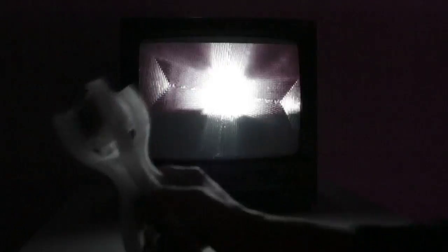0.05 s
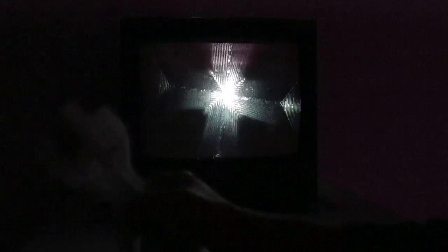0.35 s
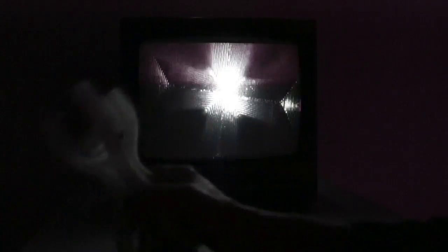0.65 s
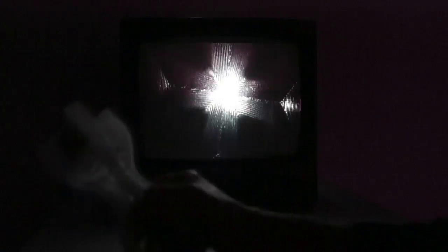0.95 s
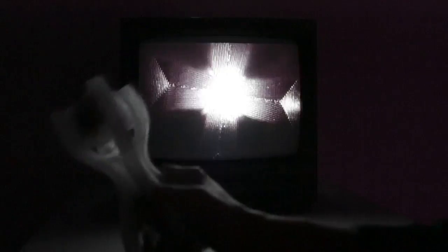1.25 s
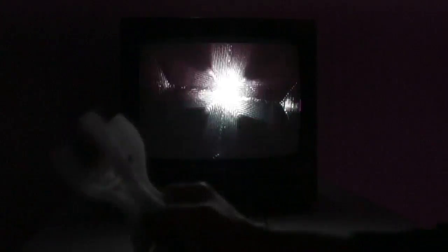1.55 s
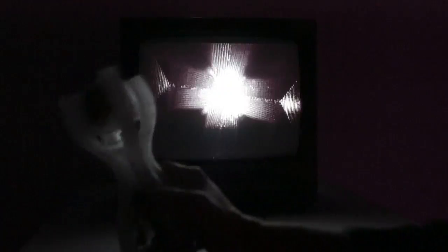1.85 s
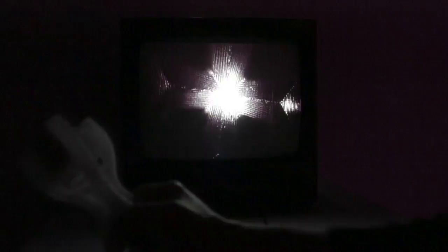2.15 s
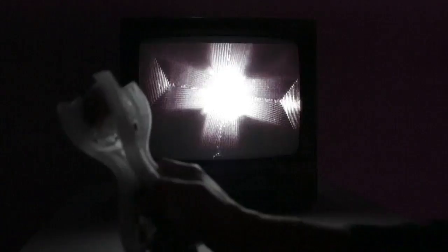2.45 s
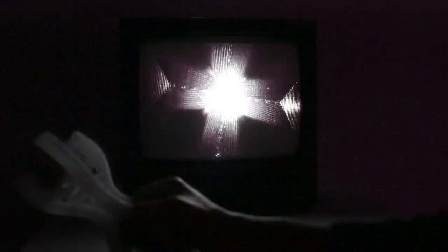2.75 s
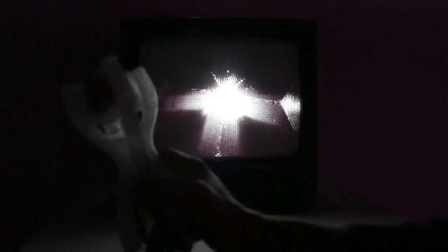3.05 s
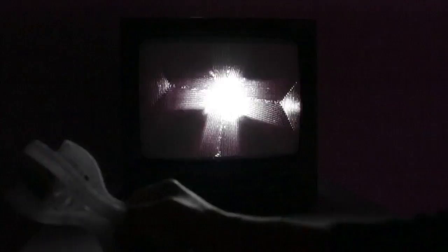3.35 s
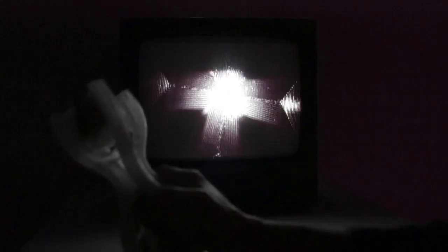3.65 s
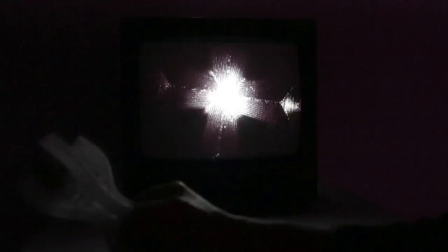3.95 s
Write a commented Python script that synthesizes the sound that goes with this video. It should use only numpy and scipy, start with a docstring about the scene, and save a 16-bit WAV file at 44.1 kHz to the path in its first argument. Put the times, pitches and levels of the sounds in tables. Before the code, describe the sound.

A plastic rattle filled with small beads is shaken by hand in a fast, even rhythm. The beads strike each end in turn with crisp, hollow bursts, sliding and ticking in between, in a small, quiet room.

```python
"""A plastic rattle full of small beads is shaken by hand, five times a second, in a small room.
On the forward stroke the beads hit one end in a tight clump; on the return they land more loosely.
Each hit makes the hollow shell ring. Between the blows the beads bounce, slide and roll along the wall.
A faint low drone and a soft rush of room noise lie underneath."""
import sys
import numpy as np
from scipy import signal
from scipy.fft import rfft, irfft
from scipy.io import wavfile
from scipy.ndimage import uniform_filter1d

SR = 44100
rng = np.random.default_rng(int(sys.argv[2]) if len(sys.argv) > 2 else 0)


def persist_wave(psi):
    """Save psi, clipped to +-1, as 16-bit WAV."""
    counts = np.round(np.clip(psi, -1, 1) * 32767).astype(np.int16)
    wavfile.write(sys.argv[1], SR, np.atleast_2d(counts).T)


N = 176400

# forward strokes: landing_s, relative_level_db, landing_scatter_s, hollow_ring_db
FORWARD_STROKES = [(0.1998, -30.5, 0.0027, 0), (0.4003, -29, 0.0024, 3.5), (0.596, -29, 0.0026, 2),
                   (0.8034, -30, 0.0023, -2), (1.0018, -30.5, 0.0023, -4.5), (1.2077, -29.5, 0.0025, -1),
                   (1.411, -29, 0.0024, 1.2), (1.6025, -28.5, 0.0027, 0), (1.808, -30.5, 0.0022, -5),
                   (2.0143, -28.5, 0.0023, 2), (2.2097, -28, 0.0021, 3.2), (2.4141, -28, 0.0024, -5),
                   (2.6275, -29, 0.0024, 0.5), (2.8331, -29.3, 0.0024, 2), (3.0393, -29, 0.0024, -1.0),
                   (3.2386, -30.5, 0.0028, 0), (3.4402, -28, 0.0032, -1.5), (3.6336, -29, 0.0021, -3.5),
                   (3.8261, -29.5, 0.0024, 3)]
# return strokes: landing_s, relative_level_db, landing_scatter_s, hollow_ring_db
RETURN_STROKES = [(0.115, -31.5, 0.003, -4), (0.3088, -33, 0.0033, -5), (0.5111, -32, 0.0029, -2),
                  (0.7061, -32.5, 0.0027, 1), (0.9204, -31, 0.0084, 2), (1.1158, -31.9, 0.0032, -0.5),
                  (1.3205, -31.5, 0.0042, -1.2), (1.5197, -32.5, 0.0032, 0), (1.722, -31.5, 0.0061, -0.5),
                  (1.9287, -30.5, 0.0031, -1.2), (2.1264, -31, 0.0032, -2.5), (2.3305, -31.5, 0.0095, -0.7),
                  (2.5381, -32.5, 0.0065, 1), (2.7446, -32.5, 0.0032, -3.5), (2.9423, -31, 0.0037, 3.0),
                  (3.1508, -30, 0.0029, 1), (3.3549, -32.5, 0.0031, -6), (3.5524, -33.5, 0.0029, 0.5),
                  (3.7439, -34, 0.0057, 1.4), (3.9471, -32.5, 0.0055, 1.3)]
# hard knocks of single beads within the strokes: start_s, relative_level_db
HARD_KNOCKS = [(0.1152, -29), (0.1989, -27), (0.3073, -27), (0.3979, -31.5), (0.5097, -33), (0.5943, -30),
               (0.7046, -30.5), (0.8029, -33.5), (0.9999, -31), (1.206, -37.5), (1.3177, -51),
               (1.3555, -43), (1.3951, -38), (1.516, -37), (1.5889, -38), (1.602, -40), (1.737, -42),
               (1.7986, -36.5), (1.8059, -33), (1.918, -38), (1.9257, -43), (2.1146, -41.7), (2.1244, -48),
               (2.414, -32), (2.5306, -38.7), (2.6265, -31.5), (2.7441, -31), (2.8331, -30.5),
               (2.9461, -35.5), (3.0585, -41), (3.2381, -28), (3.355, -28), (3.4377, -45), (3.5519, -27.5),
               (3.5653, -46), (3.6307, -34.5), (3.6784, -42.3), (3.7353, -32), (3.7483, -30),
               (3.9417, -34.5)]
# pitches at which the shell rings: pitch_hz, width_hz, forward_boost_db, return_boost_db
SHELL_RINGS = [(503, 29, 9.5, 9), (673, 115, 9.5, -3), (838, 39, 9, 8.5), (1080, 256, 12.5, 17.5),
               (1298, 205, 0.5, 5), (1343, 98, 8, -0.5), (1660, 71, 5.5, -4.5), (1860, 100, 5.5, 3),
               (2436, 220, 4, 0), (2940, 274, 5.5, 5), (3320, 195, 4, 0), (3600, 640, 4, 5.5),
               (5600, 520, 1, 4.5), (9360, 700, 2.5, 5.5)]
# tone of a bead's click, from bass to treble: frequency_hz, forward_gain_db, return_gain_db
CLICK_TONE = [(80, -52, -46), (201, -29, -42), (328, -24, -30.5), (450, -19.5, -17), (765, -8, -7.5),
              (1450, -5.5, -2), (2090, -2, -1.5), (4240, -1.5, -4), (6870, -1.5, -0.5), (8900, -2, -5),
              (10900, -3, -2.5), (12900, -3, -6.5), (14000, -4.5, -4), (17200, -12.5, -19)]
# tone of the room's echo: frequency_hz, gain_db
ECHO_TONE = [(150, 17.5), (450, 2.5), (850, 1), (1500, 2.5), (3500, -2.5), (7000, 4.5), (12000, 2),
             (16000, 4)]
# course of the faint drone: time_s, pitch_hz, level_db
DRONE_PATH = [(0, 220, -101), (1.0, 219, -85), (1.25, 218, -73), (1.6, 215, -78), (1.9, 208, -74),
              (2.4, 212, -72.5), (2.7, 212, -68), (3.0, 211, -80), (3.3, 206, -64), (3.6, 196, -71),
              (4.0, 191, -70.5)]
# tone of the steady room noise: frequency_hz, gain_db
ROOM_NOISE_TONE = [(25, -42), (55, -24), (100, -17), (150, -5.5), (200, 4.5), (300, -5.5), (800, 4.5),
                   (3000, -25), (16000, -45)]

# how the beads move: clump_gain_db, bounce_gain_db, mean_bounce_delay_s, slide_gain_db, mean_slide_lead_s
FORWARD_MOTION = (29.07, 24.7, .034, 16.8, .022)
RETURN_MOTION = (29.4, 25.84, .03, 22.9, .022)
LEAD_S, STROKE_S = .1, .6  # time before a stroke lands; its whole length with the echo
KNOCK_GAIN_DB, KNOCK_RING_S, CLICK_RING_S = 27.5, 0.0022, 0.00059
PING_DB, PING_RING_S, PING_LOW_HZ, PING_HIGH_HZ = -4.5, 0.002, 2236, 13680
HOLLOW_HZ, HOLLOW_WIDTH_HZ = 1093, 394  # the ring of the space inside the shell
ECHO_FADE_S, TREBLE_FADE_S, TREBLE_FROM_HZ = 0.66, 0.13, 6600  # a fade is a drop of 60 dB
ECHO_DELAY_S, EARLY_DECAY_S, EARLY_DB, TAIL_DB = 0.0045, 0.017, -10, -11
HZ = np.maximum(np.fft.rfftfreq(4096, 1 / SR), 1)  # the frequencies that tone curves are drawn on


def shaking():
    """Beads strike the two ends in turn; the rattle moves, so the room echoes each stroke differently."""
    out = np.zeros(N)
    for end, strokes, motion in [(1, FORWARD_STROKES, FORWARD_MOTION), (2, RETURN_STROKES, RETURN_MOTION)]:
        for landing_s, db, scatter_s, hollow_db in strokes:
            hits = stroke(landing_s, db, scatter_s, motion)
            ringing = through(hits, shell(end, hollow_db))
            add(out, room_echo(ringing), landing_s - LEAD_S)
    return out


def stroke(landing_s, db, scatter_s, motion):
    """A few beads skid ahead, the clump lands with its hard knocks, and some beads bounce back."""
    clump_db, bounce_db, bounce_s, slide_db, slide_s = motion
    size = int(STROKE_S * SR)
    share = random_shares(count=28)
    offsets_s = scatter_s * np.log(share / (1 - share)) * .6  # most beads land near the middle
    clump = bead_clicks(LEAD_S + offsets_s, spread_db=2, size=size)
    bounces = stray_beads(bounce_s, count=30, size=size)
    slide = stray_beads(-slide_s, count=14, size=size)
    out = undb(db) * (undb(clump_db) * clump + undb(bounce_db) * bounces + undb(slide_db) * slide)
    for knock_s, knock_db in HARD_KNOCKS:
        if -LEAD_S / 3 < knock_s - landing_s < LEAD_S / 2:  # only this stroke's knocks
            knock = undb(knock_db + KNOCK_GAIN_DB) * bead_click(KNOCK_RING_S)
            add(out, knock, LEAD_S + knock_s - landing_s)
    return out


def stray_beads(mean_delay_s, count, size):
    """Beads that land before or after the clump: the further from it, the fewer and softer."""
    share = random_shares(count)
    times_s = LEAD_S - mean_delay_s * np.log(share)
    return bead_clicks(times_s, spread_db=4.5, size=size, force=np.sqrt(share))


def bead_clicks(times_s, spread_db, size, force=1):
    """Many beads hit the wall, some harder than others; their total energy is 1."""
    out = np.zeros(size)
    for start_s, push in zip(times_s, force * np.ones(len(times_s))):
        strength = push * undb(spread_db * np.clip(rng.standard_normal(), -2, 2))
        add(out, strength * bead_click(CLICK_RING_S), start_s)
    return unit_energy(out)


def bead_click(ring_s):
    """One bead hits the wall: a short crack and three pings, random in pitch as each spot rings its own way."""
    t = np.arange(SR // 100) / SR
    crack = rng.standard_normal(len(t)) * np.exp(-t / ring_s)
    ping_hz = rng.uniform(PING_LOW_HZ, PING_HIGH_HZ, (3, 1))
    pings = np.sin(2 * np.pi * ping_hz * t).sum(axis=0) * np.exp(-t / PING_RING_S)
    return unit_energy(unit_energy(crack) + undb(PING_DB) * unit_energy(pings))


def shell(end, hollow_db=0):
    """How the shell rings when a bead hits one end: 1 is the forward end, 2 the return end."""
    rings_db = sum(boosts_db[end - 1] * peak(hz, width_hz) for hz, width_hz, *boosts_db in SHELL_RINGS)
    inside_db = hollow_db * peak(HOLLOW_HZ, HOLLOW_WIDTH_HZ)
    return tone_filter(tone_curve(CLICK_TONE, column=end) + rings_db + inside_db)


def rolling():
    """Loose beads keep ticking along the wall and ring both the shell and the hollow inside it."""
    ticks = bead_clicks(random_shares(count=1100) * N / SR, spread_db=2.5, size=N)
    off_pitch = (HZ - HOLLOW_HZ ** 2 / HZ) / HOLLOW_WIDTH_HZ
    hollow = tone_filter(-20 * np.log10(1 + off_pitch ** 2))
    shell_ring = set_level(through(ticks, shell(end=1)), db=-52.5)
    hollow_ring = set_level(through(ticks, hollow), db=-56.5)
    return room_echo(shell_ring + hollow_ring)


def room_echo(sound):
    """Nearby walls and furniture throw the sound back; a short tail follows, its treble dying first."""
    t = np.arange(SR // 2) / SR
    noise = rng.standard_normal((3, len(t)))
    low = signal.lfilter(*signal.butter(2, TREBLE_FROM_HZ, fs=SR), noise[0])
    high = signal.lfilter(*signal.butter(2, TREBLE_FROM_HZ, "high", fs=SR), noise[1])
    fading = low / 1000 ** (t / ECHO_FADE_S) + high / 1000 ** (t / TREBLE_FADE_S)
    arrival = np.clip(t / ECHO_DELAY_S - 1, 0, 1)
    tail = unit_energy(through(fading * arrival, tone_filter(tone_curve(ECHO_TONE))))
    early = unit_energy(noise[2] * arrival * np.exp(-t / EARLY_DECAY_S))
    return sound + through(sound, undb(TAIL_DB) * tail + undb(EARLY_DB) * early)


def drone():
    """A faint low tone that wavers and slowly sinks in pitch."""
    t = np.arange(N) / SR
    time_s, pitch_hz, level_db = np.array(DRONE_PATH).T
    hz = np.interp(t, time_s, pitch_hz) * (1 + 0.0061 * wander(samples=2500))
    db = np.interp(t, time_s, level_db) + 3.5 * wander(samples=3500)
    return np.sqrt(2) * np.sin(2 * np.pi * np.cumsum(hz) / SR) * undb(db)


def room_noise():
    """The soft, steady rush of a quiet room."""
    rush = through(rng.standard_normal(N), tone_filter(tone_curve(ROOM_NOISE_TONE)))
    return set_level(rush, db=-64)


def undb(db):
    """Turn decibels into a number to multiply by."""
    return 10 ** (np.asarray(db) / 20)


def set_level(sound, db):
    """Set the average (rms) level."""
    return sound * undb(db) / np.sqrt(np.mean(sound ** 2))


def unit_energy(sound):
    """Scale a sound so that its energy is 1."""
    return sound / np.sqrt(np.sum(sound ** 2))


def tone_curve(table, column=1):
    """Join the points of a tone table into a curve, giving each octave equal room."""
    points = np.array(table)
    return np.interp(np.log(HZ), np.log(points[:, 0]), points[:, column])


def peak(hz, width_hz):
    """A hill in a tone curve, 1 high at its centre."""
    return 1 / (1 + (2 * (HZ - hz) / width_hz) ** 2)


def tone_filter(curve_db):
    """Turn a tone curve into a filter: the short ring, of energy 1, that one sharp tap would leave."""
    cepstrum = irfft(np.log(undb(curve_db)))
    half = len(cepstrum) // 2
    cepstrum[1:half] *= 2  # folding onto the first half makes the ring come after the tap
    cepstrum[half + 1:] = 0
    return unit_energy(irfft(np.exp(rfft(cepstrum))))


def through(sound, ring):
    """Pass a sound through a filter, so that every sample leaves that ring."""
    return signal.fftconvolve(sound, ring)[:len(sound)]


def random_shares(count):
    """Random values from 0 to 1, one in each equal slot."""
    return np.clip((np.arange(count) + rng.random(count)) / count, 1e-4, 1 - 1e-4)


def wander(samples):
    """A slow random wobble, about 1 in size: noise smoothed twice."""
    smoothed = uniform_filter1d(rng.standard_normal(N), size=samples)
    return set_level(uniform_filter1d(smoothed, size=samples), db=0)


def add(out, sound, start_s):
    """Mix a sound in at a given time."""
    i = int(start_s * SR)
    if 0 <= i < len(out):
        out[i:i + len(sound)] += sound[:len(out) - i]


def scene():
    """The rattle over the drone and the room noise, in one channel."""
    return (shaking() + rolling() + drone() + room_noise())[None]


def record(dry):
    """The sound starts after 0.08 s of silence; treble above 16000 Hz is cut."""
    started = np.arange(N) / SR > .08
    treble_cut = signal.ellip(10, .2, 80, 16000, fs=SR, output="sos")
    return signal.sosfilt(treble_cut, dry * started)


dry = scene()
out = record(dry)
persist_wave(out)
```